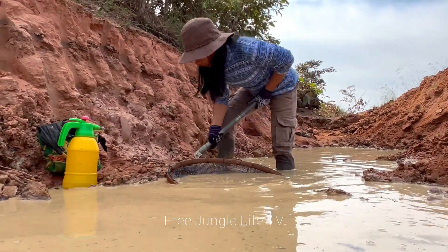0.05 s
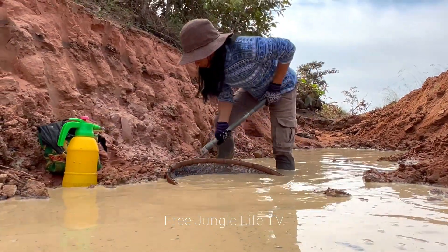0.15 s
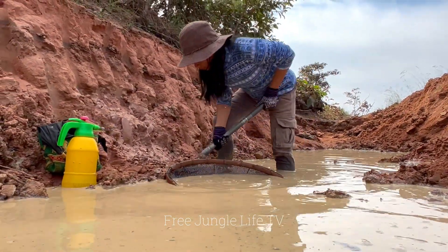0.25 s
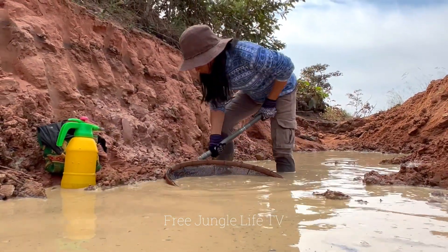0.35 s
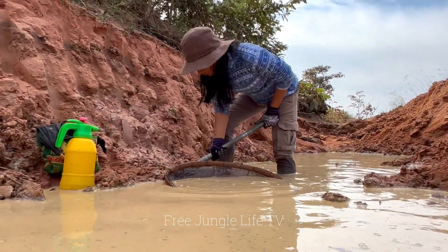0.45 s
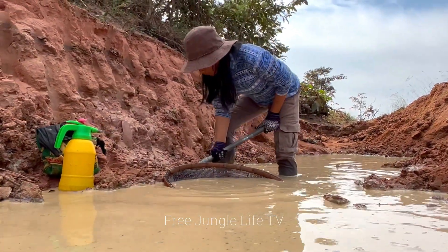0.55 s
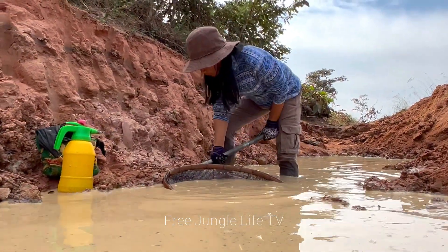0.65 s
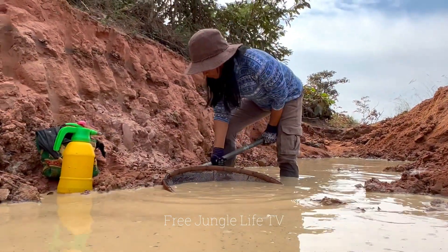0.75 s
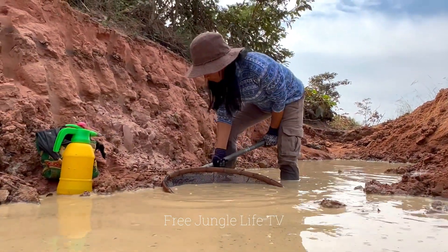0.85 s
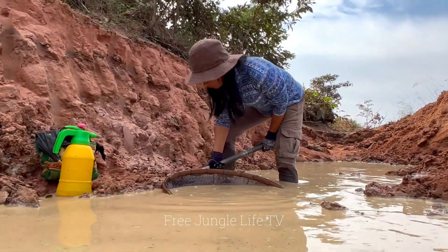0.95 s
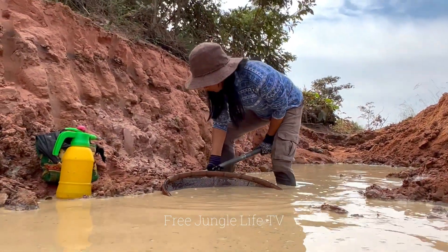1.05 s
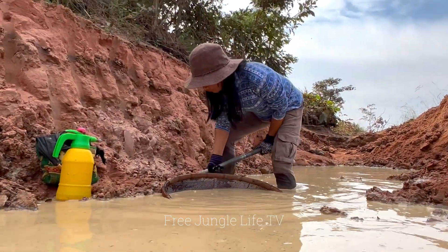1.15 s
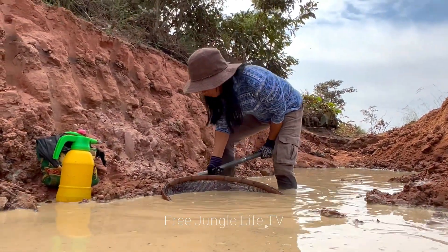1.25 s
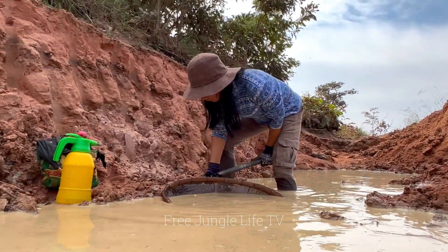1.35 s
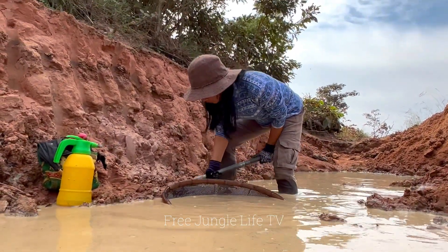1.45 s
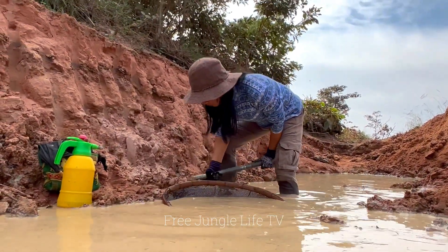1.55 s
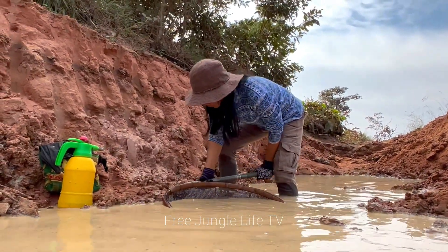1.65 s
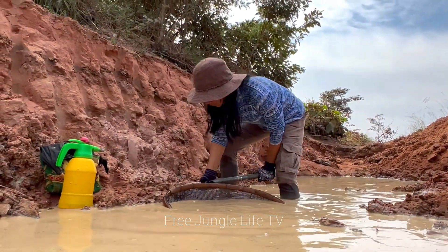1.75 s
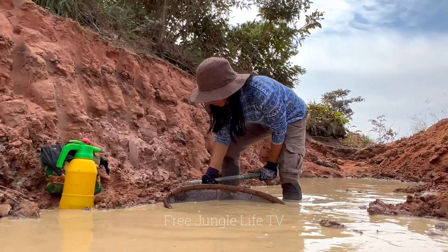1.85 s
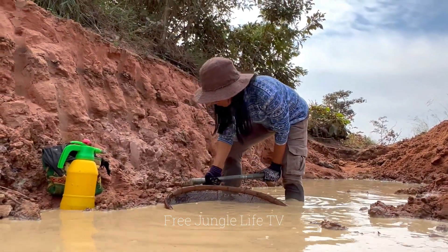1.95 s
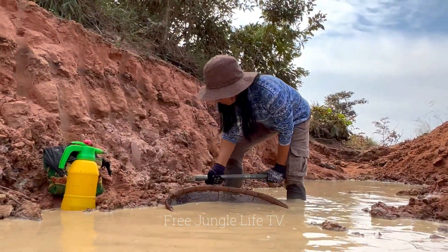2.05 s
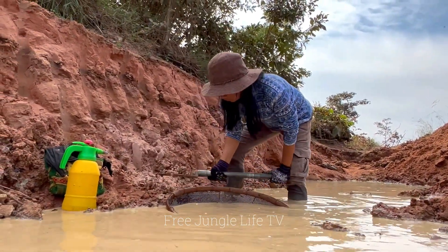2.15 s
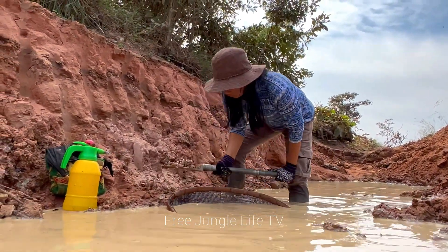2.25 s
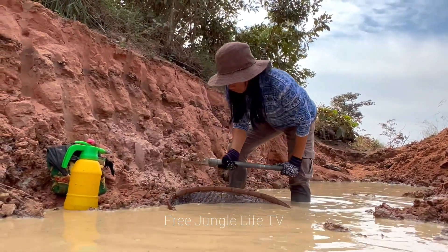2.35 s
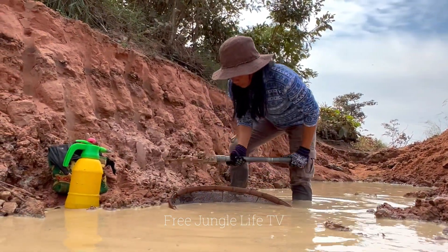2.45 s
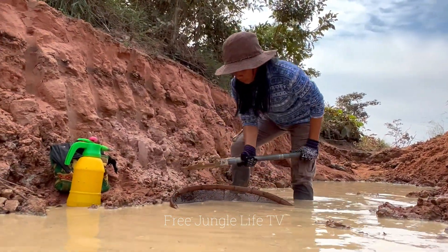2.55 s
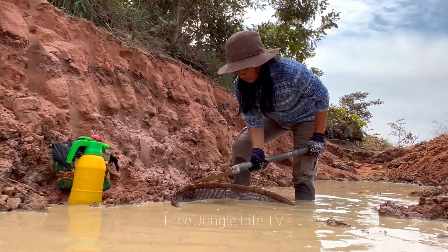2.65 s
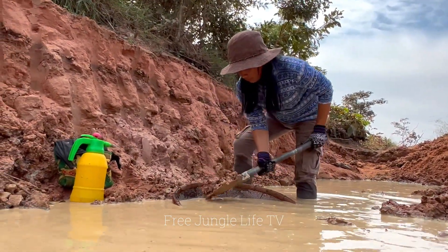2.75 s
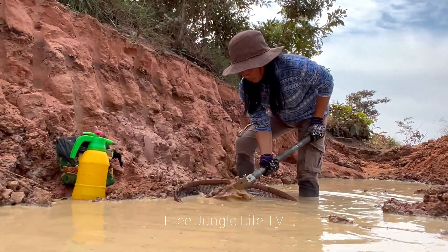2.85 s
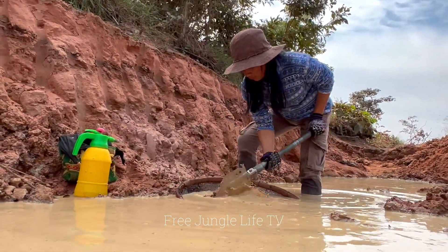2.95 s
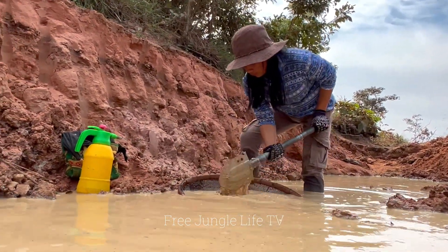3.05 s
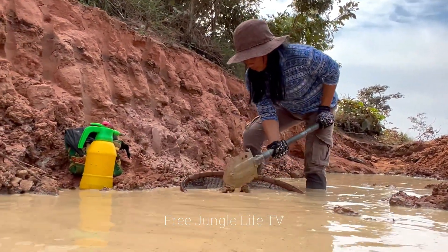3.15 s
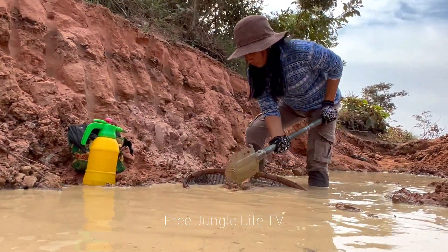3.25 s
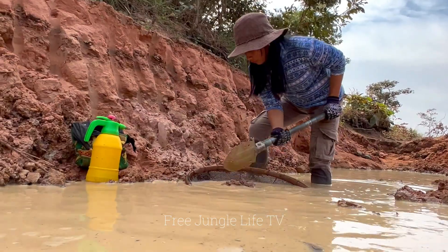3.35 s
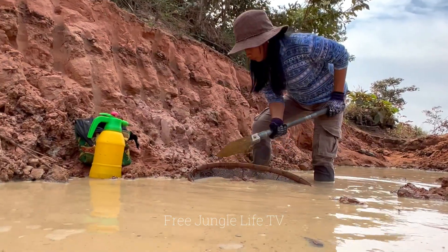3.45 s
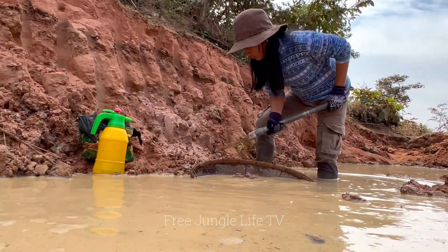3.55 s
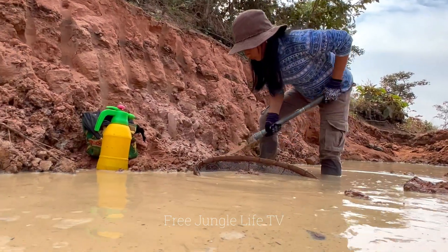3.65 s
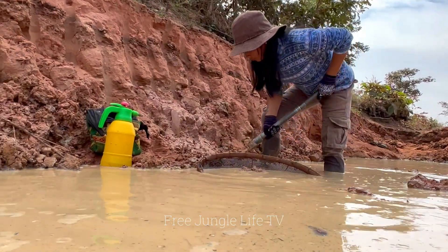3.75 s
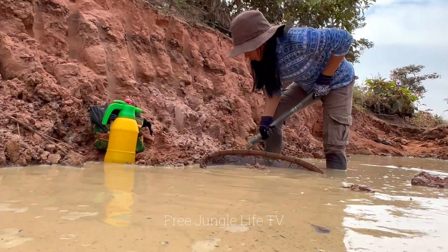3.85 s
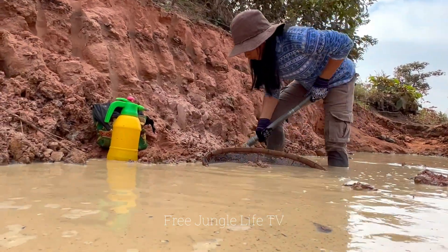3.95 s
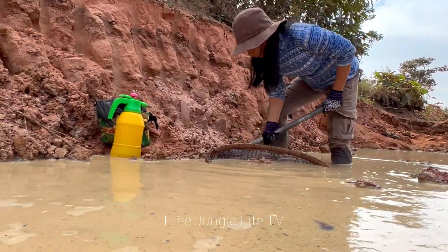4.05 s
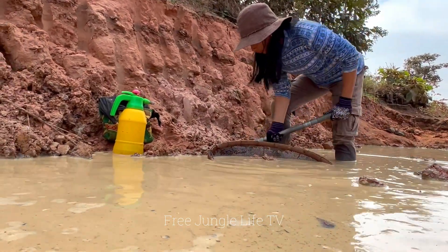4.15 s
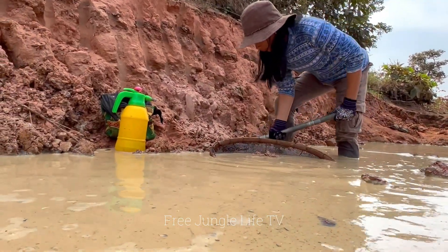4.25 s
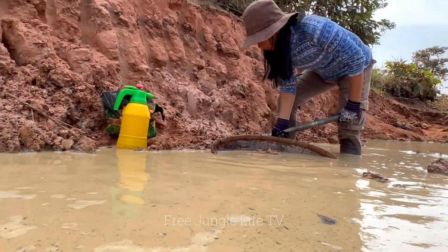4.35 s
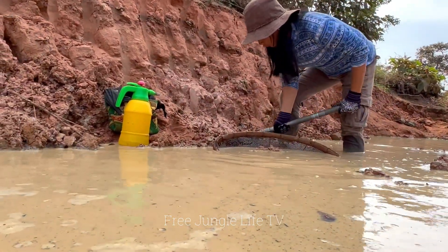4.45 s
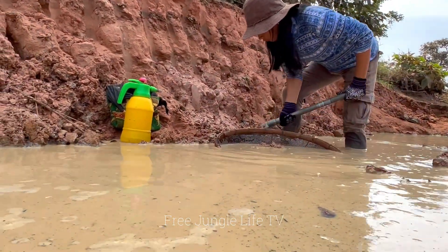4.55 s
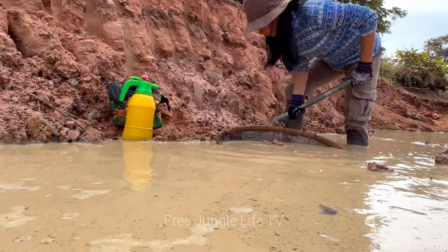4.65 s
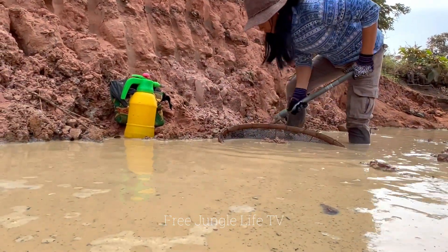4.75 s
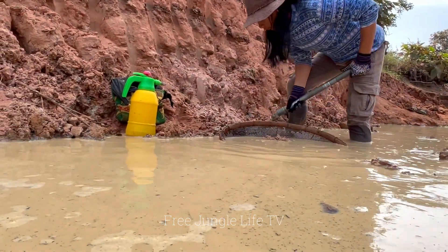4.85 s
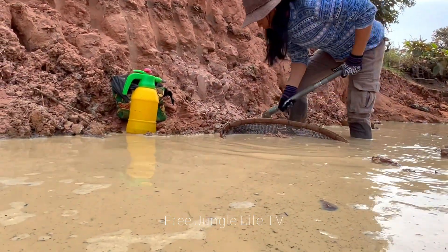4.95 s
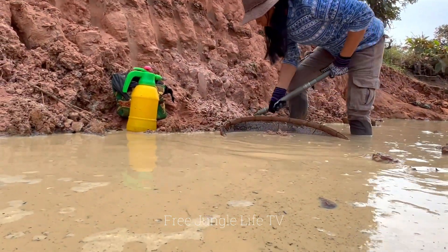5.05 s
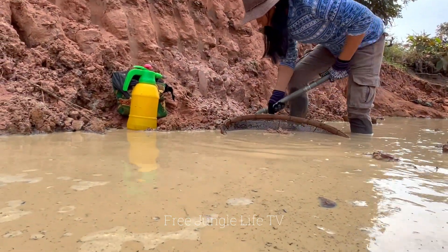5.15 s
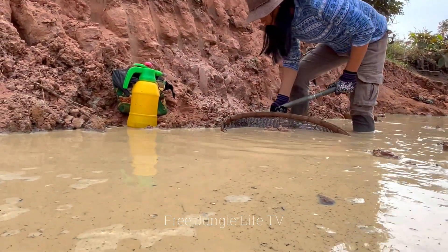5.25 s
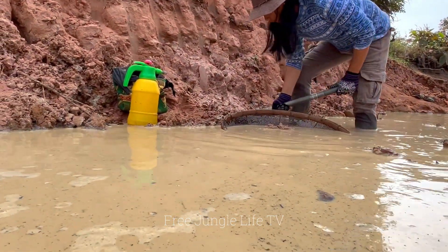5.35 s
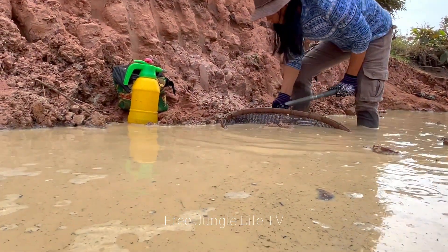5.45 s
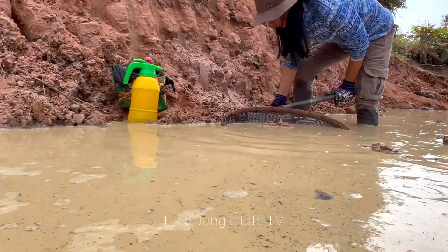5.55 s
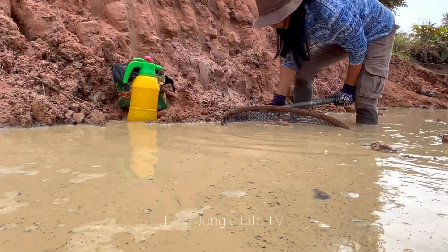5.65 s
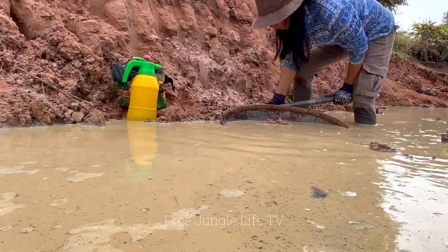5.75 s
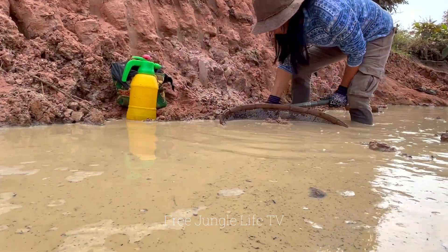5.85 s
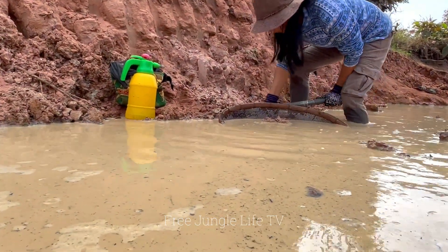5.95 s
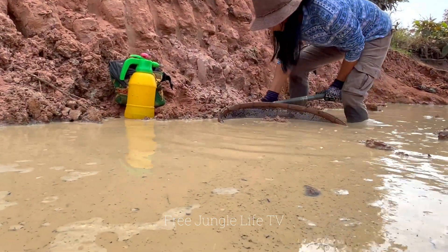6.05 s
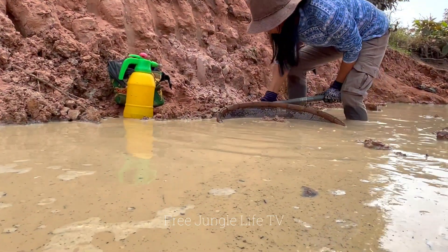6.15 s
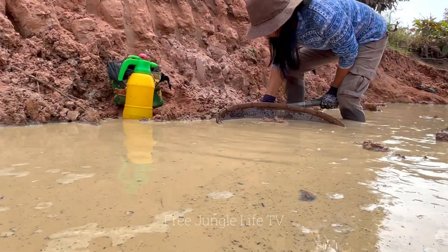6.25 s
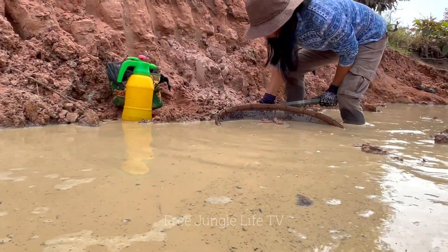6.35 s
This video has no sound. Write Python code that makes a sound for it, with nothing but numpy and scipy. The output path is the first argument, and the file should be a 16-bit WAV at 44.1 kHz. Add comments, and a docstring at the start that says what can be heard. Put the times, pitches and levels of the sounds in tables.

```python
"""A few metres away, someone in a muddy pool works a shovel through gravel in a half-sunk sieve.
First the steel blade grinds and knocks on stones while water sloshes and trapped air gulps.
From about 2 s a wet load slides off the raised blade and spatters into the pool. Near 3.8 s the
digging resumes; just before 5 s the blade scrapes clear of the water and rings, then plunges back
and pushes on. All along, a clay bank echoes briefly and the air is nearly still."""
import sys
import numpy as np
from scipy import signal
from scipy.fft import rfft, irfft, next_fast_len
from scipy.io import wavfile
from scipy.ndimage import uniform_filter1d, map_coordinates

SR = 44100
rng = np.random.default_rng(int(sys.argv[2]) if len(sys.argv) > 2 else 0)


def generate_wav(signal):
    """Clip the signal to [-1, 1] and save it as 16-bit WAV at the path in sys.argv[1]."""
    frames = np.transpose(np.atleast_2d(signal))
    scaled = np.clip(frames, -1, 1) * 32767
    pcm = np.round(scaled).astype(np.int16)
    wavfile.write(sys.argv[1], SR, pcm)


N = 281799


def stirring():
    """Stones grind along the blade in jerks while the water gurgles, fizzes, spits drops and heaves."""
    work_db, pocket_hz, hollow_db, heave_db, grit_db = shovelling()
    jerks = amp(1.6 * wobble(45) + 2.3 * wobble(170))
    stones = unit(jerks * (ticks(rate=2000, spread_db=4) + amp(-7) * rng.standard_normal(N)))
    ring = blade_ring(np.arange(SR // 4) / SR, vary_db=3.5, clear=True)
    steel = unit(signal.fftconvolve(stones, ring)[:N])
    gravel = under_water(stones, pocket_hz, hollow_db, grit_db, patchy_db=4.5)
    gurgle = froth(count=1100, centre_hz=pocket_hz, octaves=0.08, cycles=30, spread_db=4)
    fizz = froth(count=900, centre_hz=np.full(N, 1750), octaves=0.375, cycles=77, spread_db=0.5)
    droplets = spray(ticks(rate=90, spread_db=4))
    heave = unit(band(jerks * rng.standard_normal(N), 159, 325))  # the low slosh of moving water
    slurry = amp(-0.5) * gravel + amp(hollow_db - 13) * gurgle + amp(-10.5) * fizz
    slurry += amp(-13) * droplets + amp(heave_db - 4.5) * heave
    return amp(work_db) * (slurry + amp(-12.5) * is_clear(np.arange(N) / SR) * steel)


def shovelling():
    """Pushes and plunges add up to one level; their pitch, hollowness, heave and grit blend, each weighted by
    its loudness."""
    total, colour = np.zeros(N), np.zeros((4, N))
    for level_db, *traits in [*pushes(), *plunges()]:
        power = amp(np.maximum(level_db, -120)) ** 2
        total += power
        for mix, trait in zip(colour, traits):
            mix += power * trait
    return 10 * np.log10(total), *(colour / total)


# Pushes through sunken gravel. Each row: start in seconds, length in seconds, level in dB, swell in dB,
# pitch of the air pocket behind the blade in Hz, its hollow ring in dB, gritty treble in dB.
GRAVEL_PUSHES = [(0.0, 0.035, -49.5, -7, 1020, 4, -16), (0.207, 0.065, -38.5, -5.5, 1100, -2.5, -17.5),
                 (0.44, 0.044, -45, 5, 980, 14, -47), (0.637, 0.21, -47, 1.5, 559, 6, -16.5),
                 (0.888, 0.035, -38.5, 3, 581, 8.5, -18), (0.984, 0.14, -36.5, -7.5, 673, -1, -31.5),
                 (1.222, 0.13, -36.5, 7.5, 672, 0.5, -27.5), (1.526, 0.11, -40, -3, 1033, 3, -25),
                 (4.085, 0.14, -47.5, 6, 625, -2.5, -24.5), (4.681, 0.033, -57, 19.5, 1500, -5, -13),
                 (4.858, 0.017, -45, 0.5, 1266, 9, -4.5), (5.233, 0.06, -39.5, -3.5, 1197, 7, -30),
                 (5.439, 0.15, -40, 1.5, 887, 11, -18.5), (5.71, 0.058, -48, 3, 894, 6, -13.5),
                 (5.875, 0.15, -43, -15, 1027, 11.5, -16.5), (6.187, 0.12, -47, 11.5, 990, 14.5, -9),
                 (6.296, 0.14, -43, -10, 724, 1, -35)]
PUSH_HEAVE_DB = -19


def pushes():
    """The blade gathers speed through the gravel, then coasts to rest."""
    for start, length, db, swell_db, pocket_hz, hollow_db, grit_db in GRAVEL_PUSHES:
        level_db = stroke(start, length, db, swell_db, rise_db_per_s=202, fall_db_per_s=286)
        yield level_db, pocket_hz, hollow_db, PUSH_HEAVE_DB, grit_db


# Plunges into the pool. Each row: start in seconds, length in seconds, level in dB, swell in dB,
# air pocket pitch in Hz on entry and at full depth, heave of water in dB, gritty treble in dB.
POOL_PLUNGES = [(0.308, 0.057, -27, -2.5, 1100, 960, -7.5, -21.5),
                (0.997, 0.041, -31.5, -6, 760, 710, -15, -19.5),
                (1.645, 0.057, -28.5, -3.5, 654, 730, -13, -22),
                (3.79, 0.19, -38, 3.5, 2260, 1800, -11.5, -6.5),
                (3.959, 0.037, -32, 7.5, 796, 637, -11, -16),
                (5.007, 0.13, -29.5, -4, 1800, 1316, -14.5, -17.5)]
SPLASH_HOLLOW_DB = 4  # a splash tears the pocket open, so it rings little
WASH_GRIT_DB = -11


def plunges():
    """The blade strikes the water, which soon closes over it; a quieter wave washes on."""
    t = np.arange(N) / SR
    for start, length, db, swell_db, entry_hz, deep_hz, heave_db, grit_db in POOL_PLUNGES:
        span = [start, start + length]
        pocket_hz = np.interp(t, span, [entry_hz, deep_hz])  # the pocket changes size with depth
        heaving_db = heave_db + np.interp(t, span, [0.5, 0])
        splash_db = stroke(start, length, db, swell_db, rise_db_per_s=4980, fall_db_per_s=712)
        yield splash_db, pocket_hz, SPLASH_HOLLOW_DB, heaving_db, grit_db
        wash_db = stroke(start, length, db - 18.5, swell_db, rise_db_per_s=4980, fall_db_per_s=31.5)
        yield wash_db, deep_hz, SPLASH_HOLLOW_DB, heave_db - 1.5, WASH_GRIT_DB


# The tone of sunken gravel. Each row: frequency in Hz, relative level in dB.
GRAVEL_TONE = [(200, -30), (420, -1.5), (1200, -1.5), (2000, -4), (3000, 0), (4500, -3.5), (6600, -11),
               (7500, -14.5), (16000, -34)]
# The air pocket's notes. Each row: multiple of its pitch, share of the hollow ring.
POCKET_NOTES = [(1, 0.93), (1.87, 0.34)]
POCKET_HALF_WIDTH_HZ = 76


def under_water(x, pocket_hz, hollow_db, grit_db, patchy_db):
    """Sunken gravel rings at the air pocket's pitch, is weak below it and brighter where stones lie bare."""
    hz, t, spectrum = signal.stft(x, SR, nperseg=512)
    now = np.minimum((t * SR).astype(int), N - 1)
    hz, pocket = hz[:, None], pocket_hz[now]
    edge_hz = np.minimum(0.85 * pocket, 950)
    bass_cut = 0.3 + hz ** 6 / (hz ** 6 + edge_hz ** 6)
    peaks = sum(share / (1 + ((hz - k * pocket) / POCKET_HALF_WIDTH_HZ) ** 2) for k, share in POCKET_NOTES)
    treble_db = (grit_db[now] + 4.5) * hz ** 2 / (hz ** 2 + 3300 ** 2)
    patches = unit(uniform_filter1d(rng.standard_normal(spectrum.shape), size=8, axis=1))  # tone flickers
    gain = bass_cut * amp(along(GRAVEL_TONE, hz) + hollow_db[now] * peaks + treble_db + patchy_db * patches)
    return unit(signal.istft(spectrum * gain / np.linalg.norm(gain, axis=0), nperseg=512)[1][:N])


# The blade hits a stone. Each row: start in seconds, relative level in dB, brightness in Hz.
STONE_KNOCKS = [(0.279, -12.5, 1780), (0.294, -9, 1190), (0.316, -3.5, 2130), (1.101, -12.5, 2700),
                (1.337, -14, 1080), (1.639, -5.5, 2540), (1.752, -25.5, 1100), (2.155, -27.5, 2550),
                (2.26, -29, 1820), (2.283, -22, 1440), (2.423, -35, 860), (2.595, -34, 2030),
                (2.817, -24.5, 3520), (2.853, -21, 2070), (3.791, -14, 3250), (3.89, -9, 1420),
                (4.225, -21, 1390), (4.36, -8.5, 945), (4.427, -19, 680), (4.446, -13.5, 790),
                (4.591, -25, 830), (4.64, -21.5, 3120), (4.676, -28.5, 4000), (4.79, -22, 4000),
                (4.832, -21.5, 1700), (5.007, -4, 1110), (5.053, -19, 2200), (5.445, -22, 1900),
                (5.471, -22.5, 1090), (5.654, -29, 1510), (5.727, -26.5, 1490), (6.063, -23.5, 1160),
                (6.215, -14.5, 854)]


def knocks():
    """A sharp tick, a short crunch and a damped ring, all duller the deeper the stone lies."""
    track, t = np.zeros(N), np.arange(SR // 5) / SR
    for start, db, hz in STONE_KNOCKS:
        bright_octaves = np.log2(hz / 1500)
        crunch_s = 0.03 * (1500 / hz) ** 0.6  # deep stones shift for longer
        crunch = unit(rng.standard_normal(len(t)) * amp(-60 * t / crunch_s))
        ring = amp(-3 + 3 * bright_octaves) * unit(blade_ring(t, vary_db=3.5, clear=is_clear(start)))
        blow = band(crunch + ring, 0.66 * hz, 3.77 * hz, order=1)
        blow = unit(band(blow, 373, 5400, order=2))
        tick = unit(band(rng.standard_normal(len(t)) * amp(-60 * t / 0.02), 2300, 7000, order=1))
        cushion = 1 - np.exp(-t / 0.0008)  # mud softens the first touch
        add(track, start, amp(db - 28) * cushion * (blow + amp(-20 + 2 * bright_octaves) * tick))
    return track


# The steel blade's notes in air. Each row: pitch in Hz, relative level in dB, seconds to fade by 60 dB.
BLADE_NOTES = [(1480, -9, 0.3), (2550, -4, 0.15), (3770, -4, 0.09), (5110, -5, 0.08), (842, 8, 0.015),
               (1790, -2, 0.04), (2132, -4, 0.05), (3130, 0, 0.025), (6400, -3, 0.04)]
SUNK_RING_SHARE = 0.12  # how much of the ring time is left under water


def blade_ring(t, vary_db, clear):
    """Each spot that is hit stirs the blade's notes differently, and water cuts them short."""
    hz, db, fade_s = np.transpose(BLADE_NOTES)[:, :, None]
    strength = amp(db + vary_db * rng.standard_normal(hz.shape)) * rng.choice([-1, 1], hz.shape)
    fade = amp(-60 * t / (fade_s if clear else SUNK_RING_SHARE * fade_s))
    return np.sum(strength * fade * np.sin(2 * np.pi * hz * t), axis=0)


def is_clear(seconds):
    """Whether the blade is out of the water and free to ring."""
    return (seconds > 4.62) & (seconds < 4.97)


# Big bubbles. Each row: start in seconds, relative level in dB, pitch in Hz, seconds to fade by 60 dB.
AIR_GULPS = [(.355, -20.5, 1060, 0.025), (0.926, -30, 597, 0.045), (1.005, -25.5, 716, 0.022),
             (2.852, -27.5, 1033, 0.014), (3.101, -39.5, 1075, 0.029), (3.822, -32.5, 493, 0.019),
             (3.89, -24, 1700, 0.04), (3.964, -34, 661, 0.046), (3.99, -35, 658, 0.098),
             (4.009, -42, 214, 0.11), (4.361, -17, 763, 0.018), (4.445, -17, 764, 0.033),
             (4.458, -24.5, 785, 0.029), (5.078, -24, 1644, 0.038), (5.121, -23, 1296, 0.05),
             (5.142, -20, 1360, 0.012), (6.13, -41, 946, 0.033), (6.283, -27.5, 615, 0.09),
             (6.308, -43, 720, 0.039)]


def gulps():
    """The blade drags pockets of air under; each swells as its neck closes, then rings away."""
    track, t = np.zeros(N), np.arange(SR // 5) / SR
    for start, db, hz, fade_s in AIR_GULPS:
        swell = 1 - np.exp(-20 * t / fade_s)
        add(track, start, amp(db + 9.5) * swell * bubble(t, hz, fade_s, rise=0.04))
    return track


# Wet mud and gravel run off the blade. Each row: start in seconds, length in seconds, level in dB,
# swell in dB, level of the spray above the bubbles in dB.
SLURRY_POURS = [(1.814, 0.2, -50, 1, -2.5), (2.083, 0.59, -64, -10.5, 0), (2.848, 0.18, -37, 8.5, 6),
                (3.045, 0.24, -47, -8.5, 4.5), (3.367, 0.34, -67, -14.5, 1.5)]


def pours():
    """Slurry falls as an even spatter over small bubbles; a thin flow breaks into separate drops."""
    track = np.zeros(N)
    bubbles = froth(count=2800, centre_hz=np.full(N, 1360), octaves=0.33, cycles=16, spread_db=3)
    for start, length, db, swell_db, spray_db in SLURRY_POURS:
        drops = spray(ticks(rate=90000 * amp(db / 1.15), spread_db=4))
        level_db = stroke(start, length, db, swell_db, rise_db_per_s=897, fall_db_per_s=259.5)
        track += amp(level_db) * unit(bubbles + amp(spray_db) * drops)
    return track


def spray(impacts):
    """Drops strike the pool with a crisp patter over a faint slap."""
    return unit(band(impacts, 1080, 5900, order=6) + amp(-17.5) * band(impacts, 170, TOP_HZ, order=1))


def froth(count, centre_hz, octaves, cycles, spread_db):
    """A swarm of small bubbles, scattered in time and around a pitch that may move."""
    start = rng.integers(0, N, (count, 1))
    pitch, size, life = np.clip(rng.standard_normal((3, count, 1)), -2, 2)
    hz = centre_hz[start] * 2 ** (octaves * pitch)
    fade_s = cycles * 2 ** (life / 2) / hz
    n = np.arange(SR // 25)
    rings = amp(spread_db * size) * bubble(n / SR, hz, fade_s, rise=0.29)
    return unit(np.bincount((start + n).ravel(), rings.ravel(), N)[:N])


def bubble(t, hz, fade_s, rise):
    """A bubble rings and climbs in pitch as it nears the surface."""
    age = t / fade_s
    return np.sin(2 * np.pi * hz * t * (1 + rise * age / 2)) * amp(-60 * age) * (1 - np.exp(-2 * t * hz))


# The tail of the bank's echo. Each row: frequency in Hz, seconds to fade by 60 dB.
BANK_FADE = [(150, 0.36), (800, 0.083), (12000, 0.17)]


def bank_echo(x):
    """A short, diffuse echo from the bank, different left and right."""
    out, step = np.zeros((2, N)), SR // 5
    for centre in np.arange(0, N + step, step):  # a fresh random echo every 0.2 s keeps the tone even
        hz, t, noise = signal.stft(rng.standard_normal((2, SR // 6)), SR, nperseg=128)
        fade = amp(-60 * t / 0.029) + amp(-14 - 60 * t / along(BANK_FADE, hz)[:, None])
        fade /= np.linalg.norm(fade, axis=1, keepdims=True)
        colour = amp(along([(500, 0.5), (1500, 7), (4000, 1), (6300, 10.5), (9000, 10.5)], hz))[:, None]
        echoes = signal.istft(noise * fade * colour, nperseg=128)[1] / 8
        n = np.arange(max(centre - step, 0), min(centre + step, N))
        piece = x[n] * np.cos(np.pi / 2 * (n - centre) / step)
        for track, echo in zip(out, echoes):
            add(track, n[0] / SR, signal.fftconvolve(piece, echo))
    common, opposed = amp(-7.5) * out[0], amp(-10.5) * out[1]
    return np.array([common + opposed, common - opposed])


# The tone of the outdoor hush. Each row: frequency in Hz, relative level in dB.
HUSH_TONE = [(20, -18), (60, -14.5), (400, -5.5), (3000, -10.5), (6500, -15.5), (9000, -24), (16000, -78)]


def air():
    """A faint outdoor hush lies over a low, restless rumble that slowly eases."""
    noise = rng.standard_normal(N) + rng.standard_normal((2, N))
    hush = unit(filtered(noise, lambda hz: amp(along(HUSH_TONE, hz))))
    rumble = unit(band(rng.standard_normal(N) + rng.standard_normal((2, N)), 53, 105.7, order=2))
    rumble_db = curve([(1.5, -63), (2.5, -68)]) + 3.7 * wobble(20)
    return amp(-65) * hush + amp(rumble_db) * rumble


def stroke(start_s, length_s, db, swell_db, rise_db_per_s, fall_db_per_s):
    """The level of one movement in dB: it rises, swells or sags around db, then falls."""
    t = np.arange(N) / SR - start_s
    hold_db = db + swell_db * (np.clip(t / length_s, 0, 1) - 0.5)
    return hold_db - rise_db_per_s * np.maximum(-t, 0) - fall_db_per_s * np.maximum(t - length_s, 0)


def ticks(rate, spread_db):
    """Random tiny hits of uneven size, about rate of them a second."""
    size = amp(spread_db * np.clip(rng.standard_normal(N), -2, 2)) * rng.choice([-1, 1], N)
    return unit(size * (rng.random(N) < rate / SR))


def wobble(rate):
    """A smooth curve through rate random values a second."""
    return map_coordinates(rng.standard_normal(int(N * rate / SR) + 4), [np.arange(N) * rate / SR])


def amp(db):
    """Turn dB into a multiplier."""
    return 10 ** (np.asarray(db) / 20)


def unit(x):
    """Scale a sound to an average (rms) level of 1."""
    return x / np.sqrt(np.mean(x ** 2) + 1e-20)


def along(points, hz):
    """Read between (Hz, value) points, spaced by octaves."""
    point_hz, values = np.transpose(points)
    return np.interp(np.log(hz + 1), np.log(point_hz + 1), values)


def curve(points):
    """Join (seconds, value) points into one value per sample."""
    return np.interp(np.arange(N) / SR, *np.transpose(points))


def filtered(x, response):
    """Multiply each frequency in x by response(hz)."""
    size = next_fast_len(x.shape[-1] + SR // 8)
    return irfft(rfft(x, size) * response(np.fft.rfftfreq(size, 1 / SR)), size)[..., :x.shape[-1]]


def band(x, lo_hz, hi_hz, order=3):
    """Keep what lies between two frequencies."""
    return signal.sosfilt(signal.butter(order, [lo_hz, hi_hz], 'band', fs=SR, output='sos'), x)


def add(track, start_s, sound):
    """Mix a sound into a track."""
    part = track[max(round(start_s * SR), 0):][:len(sound)]
    part += sound[:len(part)]


# Where the sieve is heard. Each row: time in seconds, the left side's head start in milliseconds.
LEFT_LEAD = [(0, .08), (2.6, .07), (3.8, .015)]


def scene():
    """The sieve starts left of centre and drifts to the middle; stones and bubbles spread across it."""
    work = stirring() + knocks() + gulps() + pours()
    width = filtered(stirring() + pours(), lambda hz: amp(along([(500, -14), (1500, -9), (6000, -6)], hz)))
    shift = curve(LEFT_LEAD) * SR / 2000  # half the head start for each side, in samples
    direct = [map_coordinates(work + side * width, [np.arange(N) + side * shift]) for side in (1, -1)]
    return np.array(direct) + bank_echo(work) + air()


TOP_HZ = 15900


def record(dry):
    """The top octave comes slightly early on the right, and everything above TOP_HZ is cut."""
    right = filtered(dry[1], lambda hz: np.exp(2j * np.pi * np.maximum(hz - 8300, 0) / 3700))
    return filtered(np.array([dry[0], right]), lambda hz: hz < TOP_HZ)


dry = scene()
out = record(dry)
generate_wav(out)
```